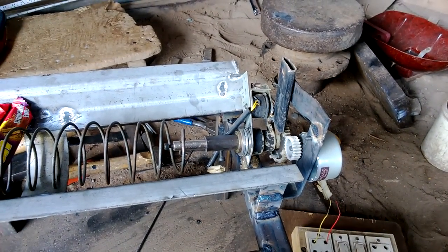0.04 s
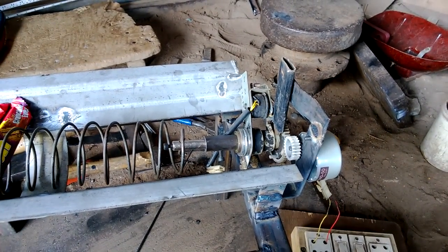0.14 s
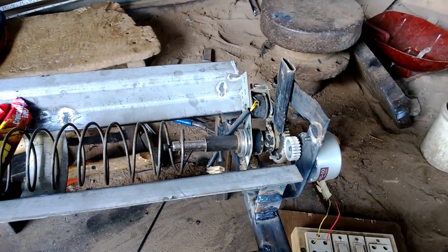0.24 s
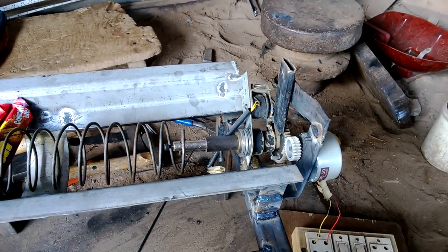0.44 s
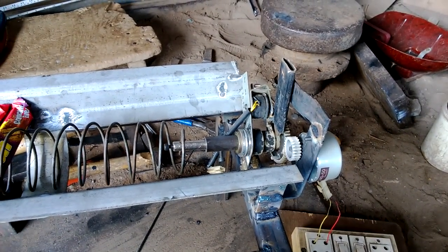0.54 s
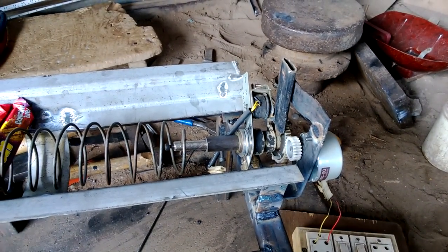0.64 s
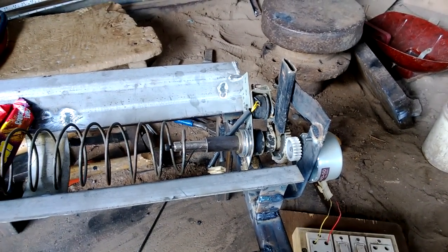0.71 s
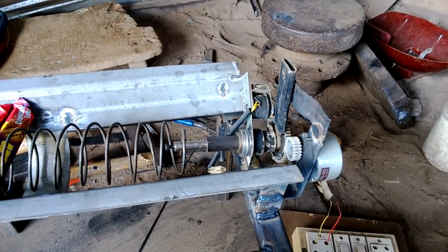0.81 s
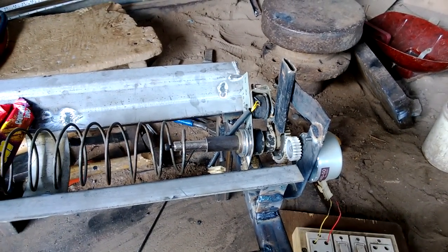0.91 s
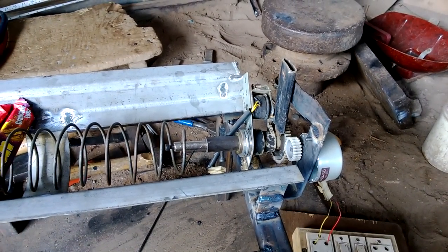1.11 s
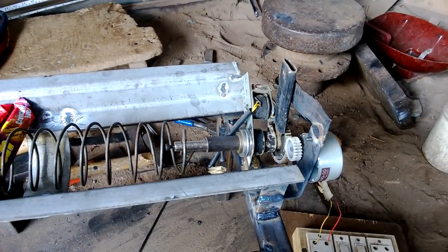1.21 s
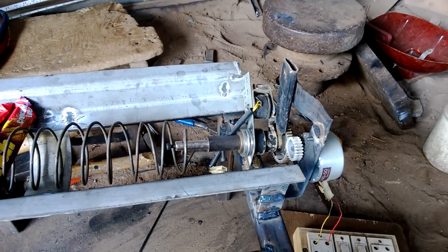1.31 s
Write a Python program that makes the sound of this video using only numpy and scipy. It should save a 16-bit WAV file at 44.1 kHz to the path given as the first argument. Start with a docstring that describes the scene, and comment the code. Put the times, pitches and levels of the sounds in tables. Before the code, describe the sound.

After a brief quiet rumble, a geared metal mechanism jolts into action close to the microphone, with bright ratcheting knocks, gritty grinding and low thumps, then stops with a short room tail and quiet background.

```python
"""In a small room, over a low outdoor rumble, a motor jerks a gear train and a steel coil in an aluminium frame.
For about half a second the teeth grind, made of dense random ticks, and slack parts knock, made of short
bursts of ticks; both ring the metal. The frame thumps on the floor as a set of fading low sines.
A thin hiss comes just before. The room's tail and the rumble are shaped noise."""
import sys
import numpy as np
from scipy import signal
from scipy.fft import rfft, irfft
from scipy.io import wavfile
from scipy.ndimage import uniform_filter1d

SR = 44100
rng = np.random.default_rng(int(sys.argv[2]) if len(sys.argv) > 2 else 0)


def gain_from_decibels(decibels):
    """Convert decibel values to linear amplitude factors."""
    exponent = np.asarray(decibels, float) / 20
    return 10 ** exponent


def store_pcm(level_fs):
    """Save levels as 16-bit WAV."""
    pcm = np.round(np.clip(level_fs, -1, 1) * 32767).astype(np.int16)
    wavfile.write(sys.argv[1], SR, np.atleast_2d(pcm).T)


N = 59535
T = np.arange(N) / SR  # time in s

# Colour of the background noise: f/Hz, level/dB (per Hz, relative)
RUMBLE_COLOUR = [(15, -23), (30, -17.5), (60, -7), (95, 0), (125, -8.5), (160, -10), (230, -14.5),
                 (350, -13), (520, -25), (750, -20.5), (950, -18.5), (1200, -27), (2000, -35),
                 (4000, -44.5), (8000, -54.5), (16000, -63.5)]
# Swell of the bass, used after taking away its mean: t/s, level/dB
BASS_SWELL = [(0, -44.5), (.07, -49), (.15, -51), (.21, -56), (.25, -42.5), (.4, -45.5), (.52, -43),
              (.6, -56), (.7, -53.5), (.8, -48.5), (.88, -53.5), (.97, -46.5), (1.05, -47.5), (1.17, -53),
              (1.24, -52.5), (1.3, -54.5), (1.35, -38.5)]
# Swell of the middle, used after taking away its mean: t/s, level/dB
MIDDLE_SWELL = [(0, -53.5), (0.101, -56), (.2, -53), (.7, -51.5), (.8, -51.5), (0.879, -53.5), (.96, -49.5),
                (1.07, -54.5), (1.14, -50.5), (1.19, -56), (1.28, -52.5), (1.35, -51)]
RUMBLE_DB, RUMBLE_FLICKER_DB = -45.5, 1.2
TREBLE_SWELL_SHARE = 0.33  # part of the middle's swell in dB

# How the room's tail dies away: f/Hz, t60/s (time to fall by 60 dB)
ROOM_DECAY = [(300, 0.29), (1000, 0.5), (3000, 0.35), (7000, .13), (13000, 0.053)]
ROOM_DB = -10

WHINE_START_S, WHINE_END_S, WHINE_HZ, WHINE_WIDTH_HZ, WHINE_DB = .16, .23, 2800, 150, -75

# Low modes of the frame on the floor: f/Hz, level/dB (relative), t60/s
FRAME_MODES = [(265, -3, .3), (320, 0, .3), (360, -1, .25), (410, -3, .25), (455, -1, .22), (515, -2, .25),
               (690, -3, .1), (780, -6, .1), (900, -3, .12)]
FRAME_HUM_DB = -22  # frame shaken by the gears
# Jolts of the frame against the floor: t/s, peak level/dB, highest fully excited f/Hz
THUMPS = [(.236, -40, 900), (0.245, -29.5, 520), (.30, -41.5, 330), (.368, -38, 900), (.378, -35, 459),
          (.392, -43, 460), (0.459, -43, 365), (.50, -39, 358), (.535, -36.5, 343), (.59, -47, 342)]
THUMP_RISE_S, THUMP_SCATTER_DB = .006, 3
THUMP_SLOPE_DB = -30  # per octave above the highest fully excited frequency

# Broad colour of bare metal contact: f/Hz, level/dB (per Hz, relative)
CONTACT_COLOUR = [(350, -51.5), (600, -9.5), (1890, -6), (2630, -7), (2860, -4), (5070, -7), (7240, -4),
                  (9140, -10), (10800, -10), (15800, -15.5)]
# Ringing of gears, coil and frame: f/Hz, width/Hz, level/dB (relative)
METAL_RINGS = [(2550, 60, -1), (2620, 70, 1), (2720, 70, 0), (3250, 250, -9), (4290, 50, -5),
               (4610, 50, -2), (5690, 170, -5), (6950, 150, -6), (7230, 100, -5), (7500, 100, -6),
               (9200, 150, -6), (10300, 350, -4), (11300, 200, -4), (12400, 300, -8), (14000, 300, -6)]
METAL_DB = -5.5  # all rings together, against the bare contact
TICKS_PER_S = 12000  # on average
TICK_SPREAD_DB = 2.2  # per unit of random size

# Slack being taken up: t/s, level/dB (before KNOCK_DB), brightness/dB per octave, favoured f/Hz
KNOCKS = [(0.2376, -22.5, -8.5, 7240), (0.2438, -12, 8, 10650), (0.3092, -17.5, 6.5, 7500),
          (0.3183, -21.5, 5, 7500), (0.3545, -26, -12.5, 2650), (.366, -21, -3, 2650),
          (.3726, -18, 4.5, 2650), (0.3833, -17, 2.5, 2650), (0.4004, -29.5, -2.5, 7200),
          (0.4399, -21, 7, 12000), (0.4533, -17, 4.5, 5700), (0.4931, -16.5, 5.5, 10500),
          (0.5044, -21.5, 3.5, 11300), (0.521, -27, -1, 4600), (0.5349, -20.5, 6.5, 7200),
          (.561, -27, -5, 3120), (0.57, -27.5, -3.5, 3200), (.58, -26, -1, 2700), (0.5909, -25.5, 7, 7200),
          (0.6042, -26, -0.5, 10400), (.8324, -56, -6, 7300), (.85, -61, -1, 14000)]
KNOCK_DB, KNOCK_RISE_S, KNOCK_T60_S = -11.5, 0.00064, 0.1
CRACK_DB, CRACK_T60_S = 4, .022  # fast first part of a knock
FAVOUR_DB, FAVOUR_OCTAVES, KNOCK_SCATTER_DB = 11, .15, 3.5

# Grinding of the teeth: t/s, level/dB, brightness/dB per octave
GRIND = [(.229, -85.5, 5), (.232, -44.5, 5.5), (.246, -34, 2.5), (.29, -35.5, 1), (.345, -38, 1.5),
         (.385, -34.5, 4), (.435, -40.5, -3), (.46, -34.5, 1), (.488, -41.5, 1), (.52, -34.5, 7),
         (.57, -38, 0), (.615, -42, -1), (.65, -45, -1), (0.686, -59.5, 6.5), (0.704, -77, -16),
         (0.739, -93, -5.5), (0.781, -103, -14)]
FLUTTER_DB = 1  # spread of the quick level changes
WANDER_DB = 5  # spread of each ring's own changes

TOP_HZ = 15900


def unit(x):
    """Scale to rms 1."""
    return x / np.sqrt(np.mean(x ** 2) + 1e-18)


def colour(x, table):
    """Filter by (Hz, dB) points joined on a log frequency axis."""
    hz, db = np.array(table).T
    log_hz = np.log(np.fft.rfftfreq(len(x), 1 / SR) + 1)
    gain = gain_from_decibels(np.interp(log_hz, np.log(hz), db))
    return irfft(rfft(x) * gain, len(x))


def ring(x, hz, width_hz):
    """Two-pole resonance with gain near 1 at the centre; a narrower one rings longer."""
    r = np.exp(-np.pi * width_hz / SR)
    return signal.lfilter([1 - r, 0, r - 1], [1, -2 * r * np.cos(2 * np.pi * hz / SR), r * r], x)


def walk(rate):
    """Random curve from levels held 1 / rate s and smoothed twice; rms 1."""
    k = int(SR / rate)
    steps = np.repeat(rng.standard_normal(N // k + 1), k)
    return unit(uniform_filter1d(uniform_filter1d(steps, k), k)[:N])


def rumble():
    """Distant noise in bands that flicker separately; bass and middle have their own swells."""
    spec = rfft(unit(colour(rng.standard_normal(N), RUMBLE_COLOUR)))
    hz = np.fft.rfftfreq(N, 1 / SR)
    bass, middle = (np.interp(T, *np.array(curve).T) for curve in (BASS_SWELL, MIDDLE_SWELL))
    bass, middle = bass - bass.mean(), middle - middle.mean()
    edges = np.r_[0, 40 * 2 ** np.arange(0, 10, .5)]  # half octaves above 40 Hz
    out = 0
    for lo, hi in zip(edges, edges[1:]):
        if hi < 200:
            swell_db = bass
        elif hi < 2000:
            swell_db = middle
        else:
            swell_db = TREBLE_SWELL_SHARE * middle
        band = irfft(spec * ((hz >= lo) & (hz < hi)), N)
        out = out + band * gain_from_decibels(RUMBLE_DB + swell_db + RUMBLE_FLICKER_DB * walk(11.4))
    return out


def room(x):
    """Many echoes blend into a tail of fading noise bands; the treble dies first."""
    t = T[:SR // 2]
    tail = 0
    for hz, t60 in ROOM_DECAY:
        band = ring(ring(rng.standard_normal(len(t)), hz, hz), hz, hz)
        tail = tail + band * gain_from_decibels(-60 * t / t60)
    tail = tail * (t > .004)  # short gap before the first echo
    return signal.fftconvolve(x, tail / np.sqrt(np.sum(tail ** 2)))[:N]


def whine():
    """A narrow faint hiss: noise through one resonance."""
    hiss = unit(ring(rng.standard_normal(N), WHINE_HZ, WHINE_WIDTH_HZ))
    return gain_from_decibels(WHINE_DB) * hiss * (T > WHINE_START_S) * (T < WHINE_END_S)


def thumps():
    """Each jolt sets the frame modes going, each with its own strength and phase."""
    out, t = np.zeros(N + SR), T[:SR // 2]
    hz, mode_db, t60 = np.array(FRAME_MODES).T[:, :, None]
    fade_out = np.hanning(2 * len(t))[len(t):]
    for s, db, top_hz in THUMPS:
        slope_db = THUMP_SLOPE_DB * np.maximum(np.log2(hz / top_hz), 0)
        scatter_db = THUMP_SCATTER_DB * rng.standard_normal(hz.shape)
        level_db = mode_db + slope_db + scatter_db - 60 * t / t60
        waves = np.sin(2 * np.pi * (hz * t + rng.random(hz.shape)))
        jolt = np.sum(gain_from_decibels(level_db) * waves, axis=0) * (1 - np.exp(-t / THUMP_RISE_S))
        i = int(s * SR)
        out[i:i + len(t)] += gain_from_decibels(db) * jolt * fade_out / np.max(np.abs(jolt))
    return out[:N]


def frame(x):
    """Low modes of the frame, shaken by the gears."""
    hum = 0
    for hz, db, t60 in FRAME_MODES:
        width_hz = np.log(1000) / np.pi / t60  # width that gives this decay time
        hum = hum + gain_from_decibels(db) * unit(ring(x, hz, width_hz))
    return unit(hum)


def ticks(count):
    """Random contacts of uneven size, rms 1."""
    hit = rng.random(count) < TICKS_PER_S / SR
    size = np.minimum(rng.exponential(size=count), 3)
    return unit(hit * rng.standard_normal(count) * gain_from_decibels(TICK_SPREAD_DB * size))


def metal(x, scatter_db):
    """Bare contact plus the resonances of gears, coil and frame."""
    rings = sum(gain_from_decibels(db + s) * ring(x, hz, width) for (hz, width, db), s in zip(METAL_RINGS, scatter_db))
    return unit(colour(x, CONTACT_COLOUR)) + gain_from_decibels(METAL_DB) * unit(rings)


def tilt(x, slope_db):
    """Three bands around 2.5, 6 and 12 kHz, weighted by a slope in dB per octave."""
    low = signal.sosfilt(signal.butter(2, 4000, fs=SR, output="sos"), x)
    high = signal.sosfilt(signal.butter(2, 9000, "high", fs=SR, output="sos"), x)
    return low * gain_from_decibels(-slope_db) + (x - low - high) + high * gain_from_decibels(slope_db)


def knocks():
    """Each knock is a short burst of contacts that favours the modes near where it strikes."""
    out, size = np.zeros(N + SR), SR // 4
    t = T[:size]
    fade = gain_from_decibels(-60 * t / KNOCK_T60_S) + gain_from_decibels(CRACK_DB - 60 * t / CRACK_T60_S)
    fade = fade * np.minimum(t / KNOCK_RISE_S, 1)
    fade_out = np.hanning(2 * size)[size:]
    mode_hz = np.array(METAL_RINGS)[:, 0]
    for s, db, slope_db, ring_hz in KNOCKS:
        near = np.exp(-(np.log2(mode_hz / ring_hz) / FAVOUR_OCTAVES) ** 2)
        mode_db = FAVOUR_DB * near + KNOCK_SCATTER_DB * rng.standard_normal(len(mode_hz))
        clank = tilt(metal(ticks(size) * fade, mode_db), slope_db)
        same_energy = np.sqrt(np.sum(fade ** 2) / np.sum(clank ** 2))  # as the fade curve
        i = int(s * SR)
        out[i:i + size] += gain_from_decibels(db + KNOCK_DB) * clank * fade_out * same_energy
    return out[:N]


def grind():
    """Teeth chatter while the motor runs and shake the frame; the rings come and go."""
    s, db, slope_db = np.array(GRIND).T
    gain = gain_from_decibels(np.interp(T, s, db))
    chatter = ticks(N) * gain_from_decibels(FLUTTER_DB * walk(120)) * gain
    ringing = metal(chatter, [WANDER_DB * walk(27) for _ in METAL_RINGS])
    bright = tilt(ringing, np.interp(T, s, slope_db))
    return np.sqrt(np.mean(gain ** 2)) * (bright + gain_from_decibels(FRAME_HUM_DB) * frame(chatter))


def scene():
    """Machine, its room and the background."""
    machine = grind() + knocks() + thumps() + whine()
    return (machine + gain_from_decibels(ROOM_DB) * room(machine) + rumble())[None]


def top_cut(x):
    """Nothing passes above the cut-off."""
    return signal.sosfilt(signal.butter(12, 16120, fs=SR, output="sos"), x)


def record(dry):
    """A steep low-pass filter removes the top of the treble."""
    low_pass = signal.ellip(12, .2, 90, TOP_HZ, fs=SR, output="sos")
    mix = signal.sosfilt(low_pass, dry)
    return top_cut(mix)


dry = scene()
out = record(dry)
store_pcm(out)
```